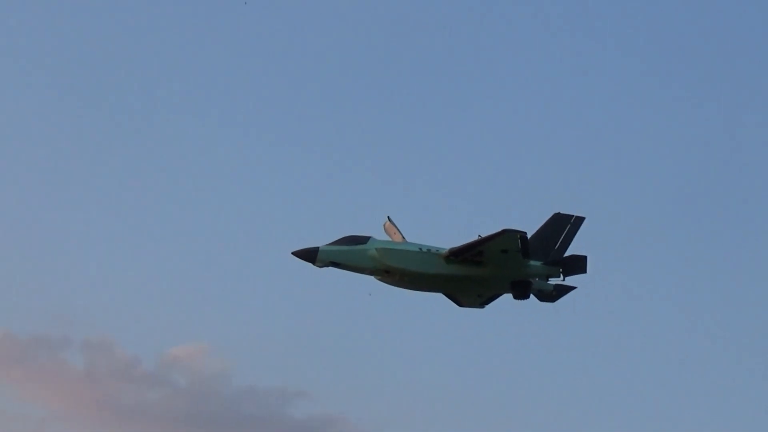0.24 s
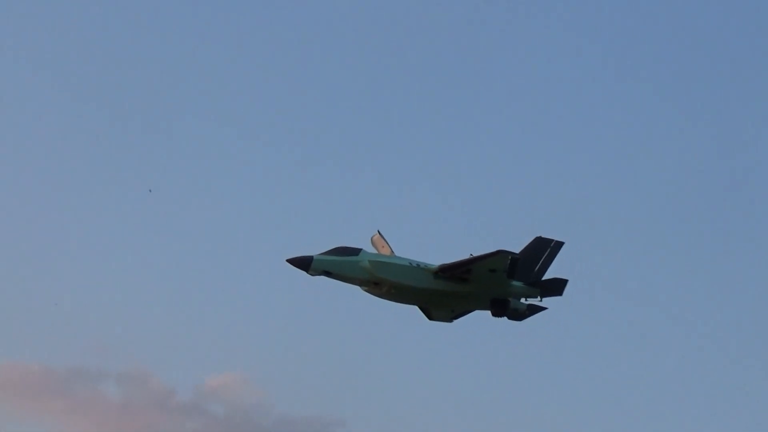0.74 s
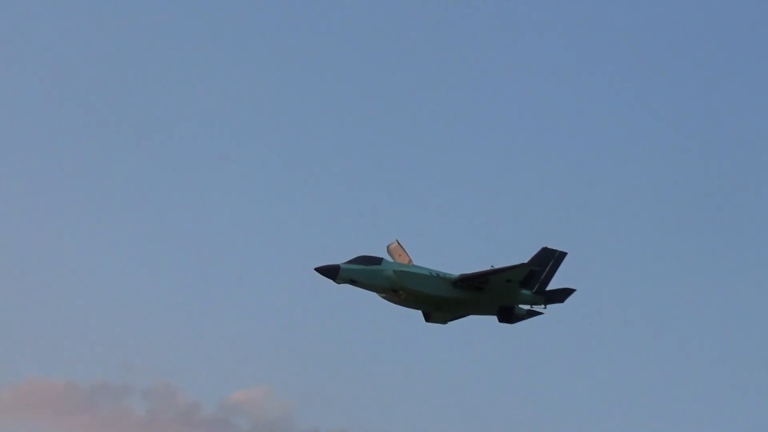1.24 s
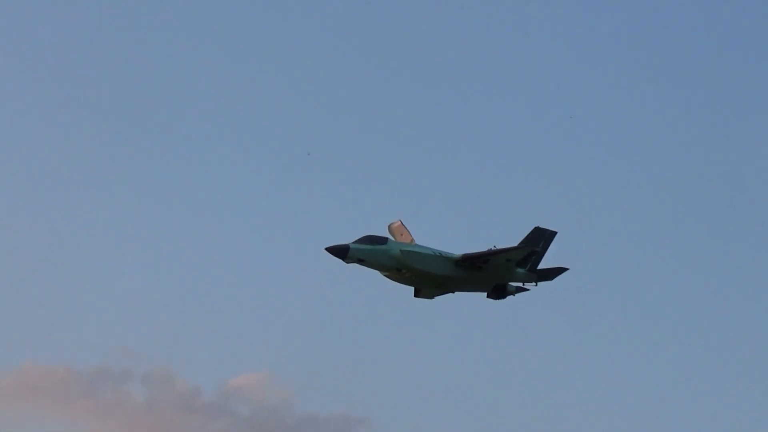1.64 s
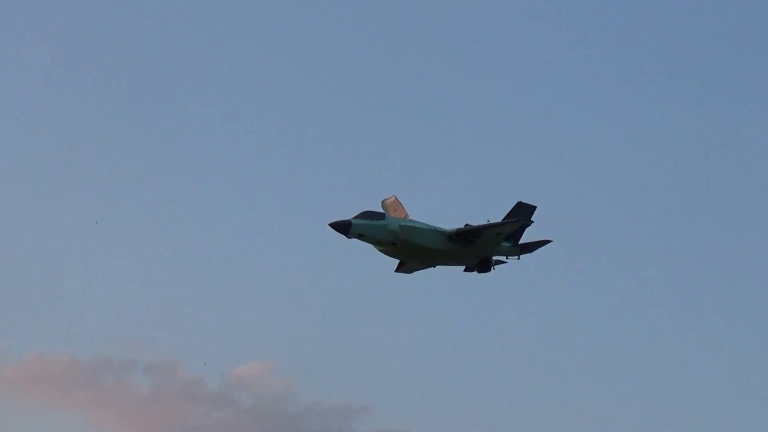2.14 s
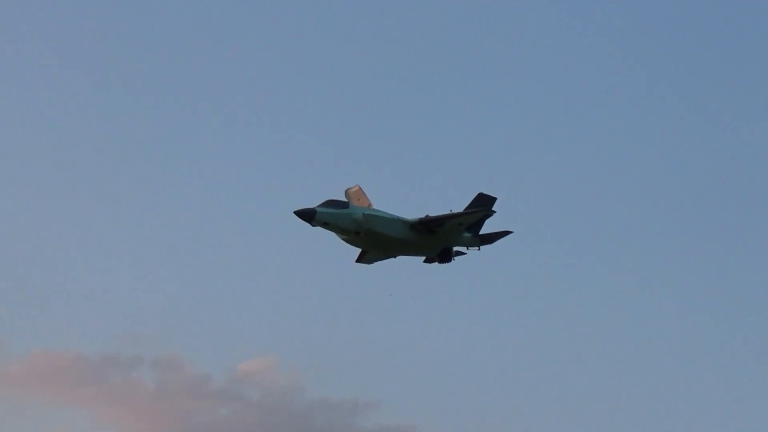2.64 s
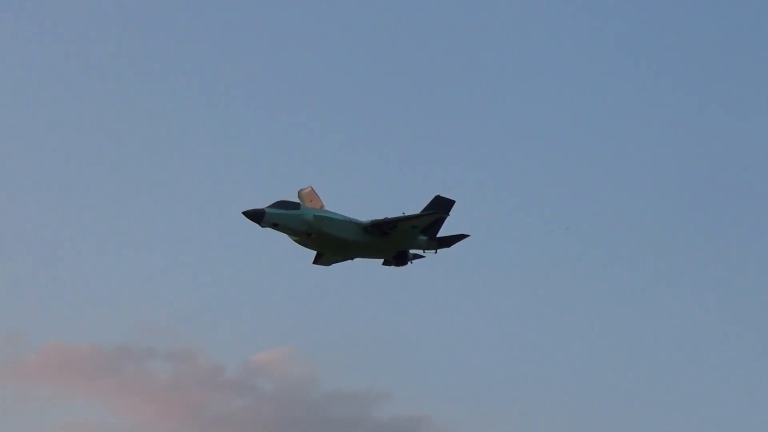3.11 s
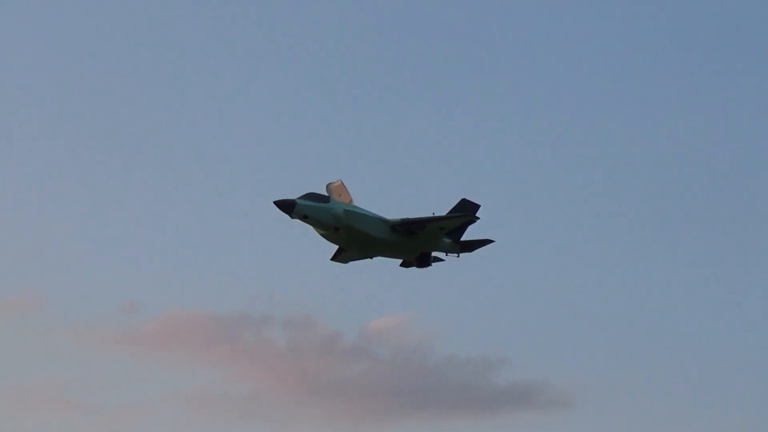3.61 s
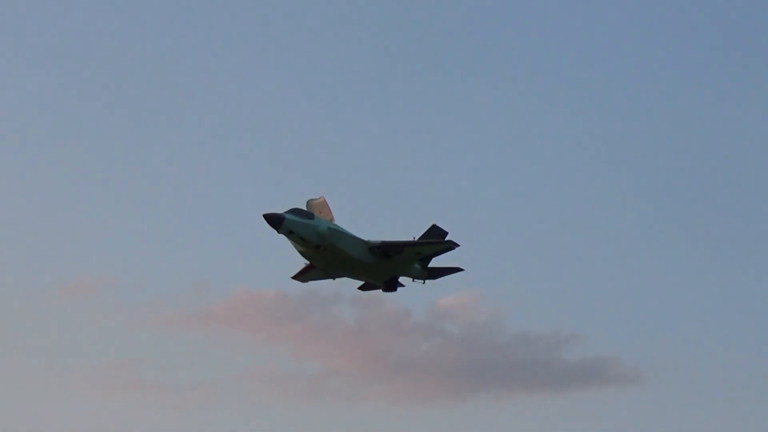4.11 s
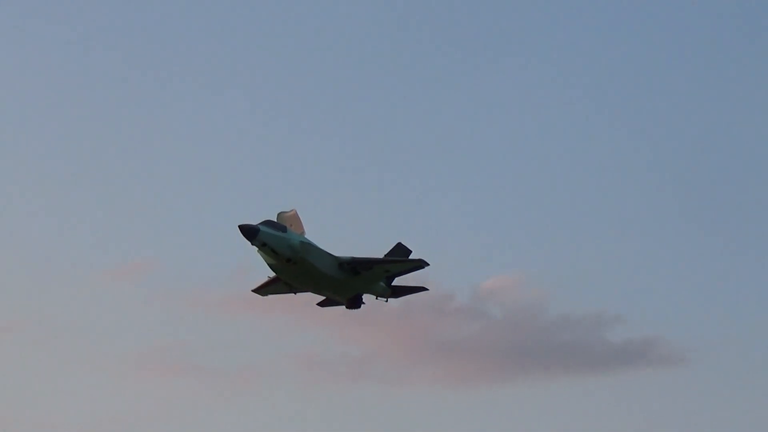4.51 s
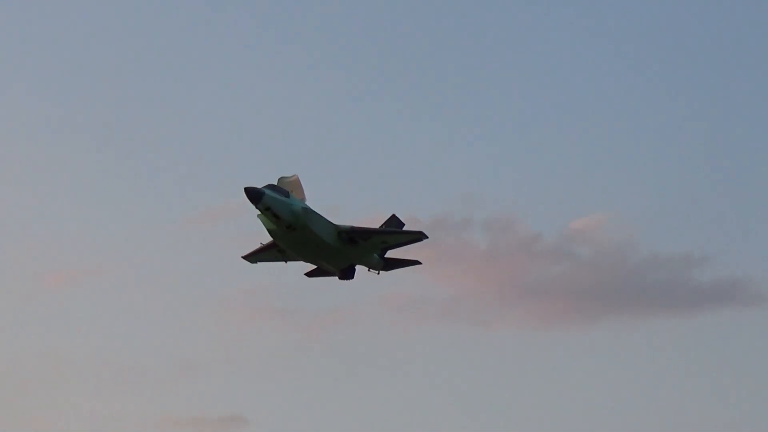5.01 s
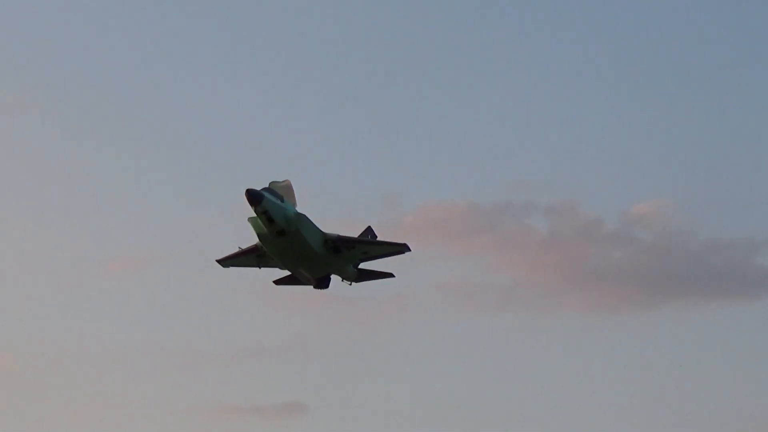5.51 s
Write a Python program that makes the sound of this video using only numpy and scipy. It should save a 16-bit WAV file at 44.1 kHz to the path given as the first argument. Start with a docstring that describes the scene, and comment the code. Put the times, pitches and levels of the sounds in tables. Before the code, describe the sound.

The shrill, slightly wavering fan whine of a model jet passes slowly overhead outdoors, with a lower whistle and hissing exhaust.

```python
"""In the open air over a field, an electric model jet hovers slowly past overhead and turns.
Two twelve-blade ducted fans whine at their shifting blade-pass frequencies; two small wing fans keep it
level and whistle lower, at their shaft speeds. The turbulent exhaust rushes, and interference with its
echo off the ground gives the rush a hollow colour. The field rumbles faintly."""
import sys
import numpy as np
from scipy.fft import rfft, irfft, next_fast_len
from scipy.io import wavfile
from scipy.ndimage import uniform_filter1d, map_coordinates

SR = 44100
rng = np.random.default_rng(int(sys.argv[2]) if len(sys.argv) > 2 else 0)


def waveform_to_disk(signal):
    """Save audio, clipped to [-1, 1], as 16-bit WAV at the path in sys.argv[1]."""
    frames = np.transpose(np.atleast_2d(signal))
    scaled = np.clip(frames, -1, 1) * 32767
    samples = np.round(scaled).astype(np.int16)
    wavfile.write(sys.argv[1], SR, samples)


N = 253575

# common throttle, eased off for the turn: (time [s], front blade-pass frequency before trim [Hz])
THROTTLE = [(0.0, 7715), (1.84, 7738), (2.1, 7681.0), (2.23, 7433), (2.58, 7473), (3.6, 7460),
            (4.11, 7626.0), (4.27, 7773), (4.83, 7763), (5.75, 7735)]
# heading of the aircraft: (time [s], turn [0 = side-on, 1 = nose-on])
HEADING = [(0, 0.04), (1.8, 0.081), (2.3, 0.61), (3.7, 0.63), (4.2, 1), (5.75, 0.97)]
# swell of the front fan's second shaft order in the turn: (time [s], gain [dB])
SWELL = [(0, 1), (1.9, 1), (2.3, 12.5), (3.1, 9), (3.65, 21), (3.9, 9), (4.2, 0), (5.75, 7)]


def front_fan(blade_hz):
    """Rotor imbalance: the louder fan adds a hum at multiples of its shaft speed to its whine."""
    # beams sweeping past: (time [s], blade tone level [dB], octave level [dB])
    beams = [(0.0, -24, -35), (0.49, -25.5, -32), (0.89, -31, -28), (1.18, -34, -34), (1.59, -26, -30),
             (1.91, -28, -33), (2.01, -31, -40), (2.12, -29, -28), (2.26, -26.5, -29), (2.47, -26, -22.5),
             (2.87, -25, -27), (3.3, -25, -28), (3.41, -33.5, -24), (3.87, -22, -26), (4.22, -21.5, -38),
             (4.56, -19, -37), (5.58, -17.5, -40.5), (5.72, -21.5, -36)]
    # imbalance tones: (order [multiple of shaft speed], side-on level [dB], nose-on level [dB])
    orders = [(1, -46, -53.5), (2, -62, -58), (3, -52, -57), (4, -48.5, -52.5), (5, -52, -55),
              (6, -45, -58), (7, -54.5, -59), (8, -61, -59), (10, -59, -65), (16, -40, -70)]
    blades = 12
    phase = rotor_phase(blade_hz)
    swell_db, = curves(SWELL)
    hum = shaft_tones(phase / blades, orders, swell_db, swell_order=2, flutter=0.22, rough=0.032)
    return hum + whine(phase, beams, flutter=0.029, rough=0.041, blade_gain_db=0.2, octave_gain_db=0.2)


def rear_fan(blade_hz):
    """A balanced rotor sounds only its blade tones: a plain whine, about a semitone below the front fan."""
    # strength of the whine: (time [s], blade tone level [dB], octave level [dB])
    levels = [(0.0, -24.5, -35), (0.59, -21, -32), (1.4, -24.5, -27.5), (1.78, -24.5, -31),
              (1.89, -24.5, -42), (2.01, -24, -32), (2.15, -24.5, -39), (2.2, -24.5, -34),
              (2.55, -29.5, -34), (3.06, -25.5, -34), (3.73, -30, -29), (4.08, -26.5, -40),
              (4.86, -30.5, -36), (5.59, -28, -31.5), (5.72, -27, -26)]
    phase = rotor_phase(blade_hz)
    return whine(phase, levels, flutter=0.066, rough=0.056, blade_gain_db=0.67, octave_gain_db=-0.5)


def ducted_speeds():
    """Differential thrust holds the nose level: front and rear blade-pass Hz are nudged opposite ways."""
    # trim nudges: (middle time [s], length [s], frequency added to the front fan [Hz])
    nudges = [(0.29, 0.47, 40.0), (0.67, 0.22, 49.0), (0.83, 0.24, -43.0), (1.196, 0.49, 48.0),
              (1.599, 0.48, -65.0), (2.02, 0.28, 134.5), (2.298, 0.44, -62.5), (2.459, 2.72, 60.0),
              (3.386, 0.2175, -32.5), (3.79, 0.17, -15.5), (4.76, 0.27, 16.5), (4.9, 0.2, -16.5),
              (5.53, 1.65, 41.0)]
    rear_ratio, rear_trim = 0.9355, 1.058
    throttle_hz, = curves(THROTTLE)
    trim_hz = bumps(nudges)
    hunt_hz = lambda: 3.99 * wobble(14)  # each motor hunts round its set speed
    front_hz = throttle_hz + trim_hz + hunt_hz()
    rear_hz = rear_ratio * throttle_hz - rear_trim * trim_hz + hunt_hz()
    return front_hz, rear_hz


def whine(phase, levels, flutter, rough, blade_gain_db, octave_gain_db):
    """Periodic pressure pulses from passing blades radiate the blade-pass tone and its octave."""
    blade_db, octave_db = curves(levels)
    blade_tone = amp(blade_db + blade_gain_db) * tone(phase, flutter, rough)
    twinkle_db = 0.6 * wobble(14)  # the octave's shorter waves twinkle more in the moving air
    octave = amp(octave_db + octave_gain_db + twinkle_db) * tone(2 * phase, flutter=0.21, rough=0.11)
    # eddies add a wavering skirt that remains when the beam points away
    skirt = amp(-46.5) * unit(np.real(eddies(70) * np.exp(1j * phase)))
    return blade_tone + octave + skirt


def shaft_tones(shaft_phase, orders, swell_db, swell_order, flutter, rough):
    """Harmonics of the shaft rotation are directional, so the heading sets how strongly each is heard."""
    sound = np.zeros(N)
    for order, side_db, nose_db in orders:
        level_db = facing(side_db, nose_db) + swell_db * (order == swell_order)
        twinkle_db = 1.3 * wobble(4.02)  # each tone fades and returns in the moving air
        sound += amp(level_db + twinkle_db) * tone(order * shaft_phase, flutter, rough)
    return sound


def tone(phase, flutter, rough):
    """Intake eddies modulate a rotor tone (rms 1) in size and phase: flutter slowly, rough quickly."""
    modulation = 1 + flutter * eddies(45) + rough * (eddies(140) + 0.98 * eddies(450))
    return unit(np.real(modulation * np.exp(1j * phase)))


def rotor_phase(hz):
    """Phase in radians is the integral of speed, whose changes the rotor's inertia rounds off."""
    return 2 * np.pi * np.cumsum(uniform_filter1d(hz, size=1500, mode="nearest")) / SR


def air_rush():
    """Turbulence radiates broadband noise: exhaust, ducts and blades swell together and each shimmers."""
    # common strength, weaker once the nose has come round: (time [s], level [dB])
    strength = [(0.0, -31), (1.52, -30.5), (1.89, -32.0), (2.58, -30.5), (3.68, -31.5), (4.19, -35.5),
                (5.75, -33.5)]
    # brief surges: (middle time [s], length [s], gain [dB])
    surges = [(0.12, 0.36, 1.4), (0.5, 0.28, 1.5), (0.85, 0.32, 1.9), (1.22, 0.18, 2.2), (2.03, 0.19, 3),
              (2.36, 0.61, 2.1), (3.69, 0.24, 2.2), (4.31, 0.22, 2.7), (4.72, 0.6, 3.5), (5.22, 0.19, 1.6),
              (5.63, 0.41, 2)]
    # spectra of exhaust roar and duct turbulence: (frequency [Hz], relative level [dB])
    exhaust_spectrum = [(20, -47), (60, -33), (120, -24), (170, -5.5), (250, -1.5), (350, 1.5), (440, -4.5),
                        (600, 3), (800, 3), (1150, 1), (1600, -12), (3000, -17.5)]
    duct_spectrum = [(500, -24.5), (1100, -6.5), (1600, 0.8), (2000, 1.5), (2700, -1.2), (3500, -3.5),
                     (4200, -2), (4900, -7), (5300, -10.5), (6200, -2), (7200, 1), (9000, -19.5)]
    # spectra of blade hiss, side-on and nose-on: (frequency [Hz], relative level [dB])
    side_spectrum = [(4500, -19), (6300, -10.5), (7200, -1.5), (8300, -0.5), (8800, 0.5), (10200, 2),
                     (11400, -1), (12800, -10), (14000, 0.5), (15000, -6.5), (16000, -23)]
    nose_spectrum = [(4500, -47), (6300, -13), (7200, 1.5), (8300, 2), (8800, -3), (9500, 3), (11200, 1.5),
                     (12800, -6.5), (14000, -2), (15000, -5), (16000, -14.5)]
    rush_db, = curves(strength)
    turn, = curves(HEADING)
    exhaust_gain = amp(facing(side_db=-7.5, nose_db=-8) + 0.19 * wobble(12))
    exhaust = exhaust_gain * ground_echo(noise(exhaust_spectrum), share=0.83, cutoff_hz=1390)
    duct_gain = amp(facing(side_db=-4.5, nose_db=-2) + 0.29 * wobble(17))
    duct = duct_gain * ground_echo(noise(duct_spectrum), share=0.38, cutoff_hz=1300)
    hiss = np.sqrt(1 - turn) * noise(side_spectrum) + np.sqrt(turn) * noise(nose_spectrum)
    hiss_gain = amp(2.5 + 0.67 * wobble(25.02))
    return amp(rush_db + bumps(surges)) * (exhaust + duct + hiss_gain * hiss)


def ground_echo(direct, share, cutoff_hz):
    """Comb filtering: direct sound interferes with its later, duller bounce off the grass (sum at rms 1)."""
    # lag of the bounce: (time [s], delay [ms])
    lag = [(0, 5), (1.8, 5.05), (2.5, 4.96), (3.1, 5.02), (3.8, 4.87), (4.4, 4.54), (5.75, 4.6)]
    delay_ms, = curves(lag)
    bounce = filtered(direct, lambda hz: 1 / np.sqrt(1 + (hz / cutoff_hz) ** 2))
    delayed_index = np.arange(N) - delay_ms * SR / 1000
    return unit(direct + share * map_coordinates(bounce, [delayed_index], order=1))


def wing_fans():
    """Differential thrust trims the roll: one small whistling fan gains the speed that the other loses."""
    # near fan's rotation: (time [s], shaft speed [Hz])
    near_speed = [(0, 1386), (.35, 1363), (.97, 1353), (1.22, 1386), (1.52, 1382), (1.7, 1416),
                  (1.94, 1371), (2.38, 1320), (2.7, 1318), (3.28, 1369), (3.52, 1378), (4, 1366),
                  (4.3, 1397), (5.15, 1390), (5.75, 1375)]
    # near fan's shaft tone as its beam sweeps past: (time [s], level [dB])
    near_levels = [(0, -44), (.75, -42.5), (1.05, -39), (1.22, -32.5), (1.75, -28.5), (2.32, -36.5),
                   (2.95, -37), (3.3, -30.5), (3.7, -32), (3.92, -40.5), (4.86, -39), (5.2, -43),
                   (5.75, -41)]
    # near fan's overtones: (order [multiple of shaft speed], side-on level [dB], nose-on level [dB])
    orders = [(2, -50.5, -47.5), (3, -49, -53.5), (4, -52.5, -55)]
    # far fan's shaft tone, shadowed by the fuselage at times: (time [s], level [dB])
    far_levels = [(0, -44), (1, -44.5), (1.3, -60), (2.3, -46.5), (3.65, -50.5), (4.3, -57), (5.75, -50)]
    blades, speed_ratio = 6, 0.1815  # ratio of the pair's mean shaft speed to the throttle frequency
    near_hz, = curves(near_speed)
    near_db, = curves(near_levels)
    swell_db, = curves(SWELL)
    near_phase = rotor_phase(near_hz)
    beam_db = near_db - near_db.mean()
    blade_db = facing(side_db=-42.5, nose_db=-40.8) + 0.35 * beam_db
    near = amp(near_db - 0.5) * tone(near_phase, flutter=0.1, rough=0.045)
    near += amp(blade_db) * tone(blades * near_phase, flutter=0.37, rough=0.2)
    overtones = shaft_tones(near_phase, orders, 0.39 * swell_db, swell_order=3, flutter=0.39, rough=0.1)
    near += amp(0.15 * beam_db) * overtones
    throttle_hz, = curves(THROTTLE)
    far_db, = curves(far_levels)
    far_phase = rotor_phase(2 * speed_ratio * throttle_hz - near_hz)
    far = amp(far_db) * tone(far_phase, flutter=0.17, rough=0.059)
    far += amp(-45.0) * tone(blades * far_phase, flutter=0.92, rough=0.36)
    return near + far


def field_rumble():
    """Ambient noise: the open field gives a faint, distant rumble that wavers in level."""
    # rumble spectrum: (frequency [Hz], relative level [dB])
    spectrum = [(20, -16), (50, -9), (85, 2), (120, -1.5), (200, 11.5), (300, -2), (600, 14), (1200, -25),
                (4000, -26), (12000, -36)]
    return amp(-49.5 + 3.0 * wobble(4.9)) * noise(spectrum)


def stereo_hiss():
    """A faint hiss and low murmur, opposite in the two channels, slightly widen the sound."""
    # spectrum of the hiss and murmur: (frequency [Hz], relative level [dB])
    spectrum = [(70, -50), (130, -14), (200, 6), (320, -19), (620, -2), (950, -33), (3500, -19),
                (4600, -34), (6500, -4), (7500, 21.5), (9300, 4), (10600, -6), (13000, -2.5), (15500, -4)]
    return amp(-50.5) * noise(spectrum)


def facing(side_db, nose_db):
    """Directivity: a level moves from its side-on to its nose-on value as the aircraft turns."""
    turn, = curves(HEADING)
    return side_db + turn * (nose_db - side_db)


def amp(db):
    """Decibels to amplitude gain."""
    return 10 ** (np.asarray(db) / 20)


def unit(x):
    """The signal normalised to rms 1."""
    return x / np.sqrt(np.mean(x ** 2) + 1e-20)


def curves(rows):
    """Linear interpolation, one value per sample, of each column after the time."""
    times, *columns = np.transpose(rows)
    return [np.interp(np.arange(N) / SR, times, column) for column in columns]


def bumps(rows):
    """Superposed raised-cosine pulses, one per (middle time [s], length [s], height) row."""
    t = np.arange(N) / SR
    return sum(height * np.cos(np.pi * np.clip((t - middle) / length, -0.5, 0.5)) ** 2
               for middle, length, height in rows)


def wobble(rate):
    """Smooth random fluctuation through rate knots a second."""
    knots = rng.standard_normal(int(N * rate / SR) + 4)
    steps = np.arange(0, len(knots) - 1, 1 / 10)
    spline = map_coordinates(knots, [steps], mode="nearest")
    return np.interp(np.arange(N) * rate / SR, steps, spline)


def eddies(rate):
    """A random phasor: independent fluctuations in phase and in quadrature."""
    return wobble(rate) + 1j * wobble(rate)


def filtered(x, response):
    """Linear filtering: the spectrum of x times a frequency response."""
    size = next_fast_len(N + SR // 4)
    return irfft(rfft(x, size) * response(np.fft.rfftfreq(size, 1 / SR)), size)[..., :N]


def noise(spectrum):
    """White noise shaped by (frequency [Hz], relative level [dB]) rows, at rms 1."""
    knot_hz, db = np.transpose(spectrum)
    response = lambda hz: amp(np.interp(np.log(hz + 1), np.log(knot_hz), db))
    return unit(filtered(rng.standard_normal(N), response))


def scene():
    """The sources superpose in two nearly equal channels, so the aircraft is heard straight ahead."""
    front_hz, rear_hz = ducted_speeds()
    fans = front_fan(front_hz) + rear_fan(rear_hz)
    mid = fans + wing_fans() + air_rush() + field_rumble()
    # the whine is slightly out of step between the two channels
    quadrature = lambda hz: 1j * np.exp(-((hz - 7500) / 1800) ** 2)
    side = amp(-26.0) * filtered(fans, quadrature) + stereo_hiss()
    return np.array([mid + side, mid - side])


def record(dry):
    """Band limiting: a steep low-pass removes the highest treble."""
    cutoff_hz = 15780
    return filtered(dry, lambda hz: 1 / (1 + (hz / cutoff_hz) ** 300))


dry = scene()
out = record(dry)
waveform_to_disk(out)
```